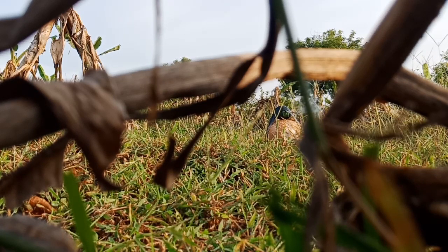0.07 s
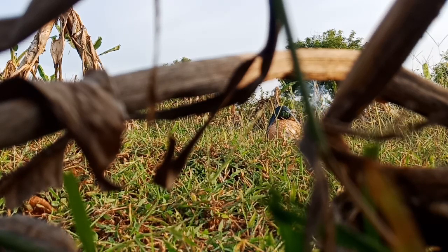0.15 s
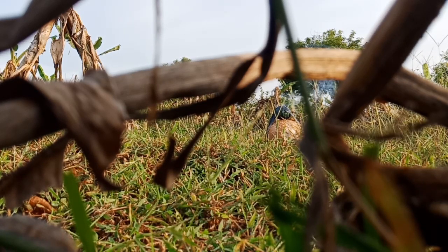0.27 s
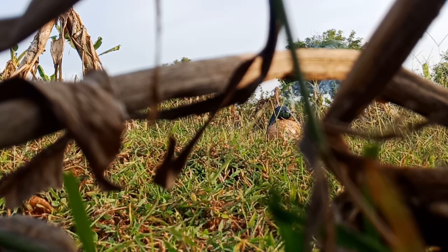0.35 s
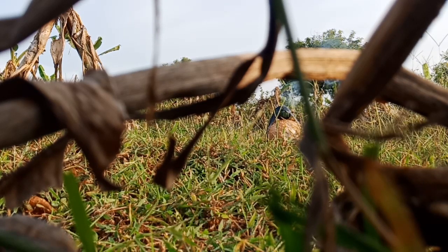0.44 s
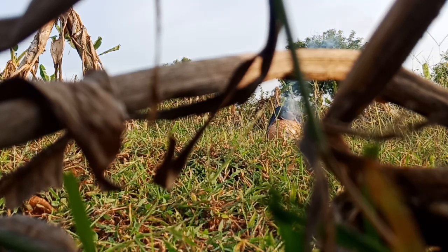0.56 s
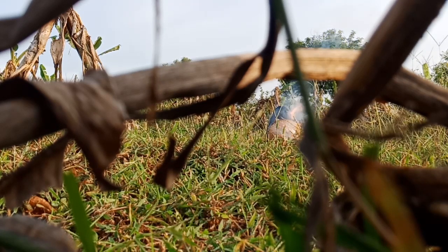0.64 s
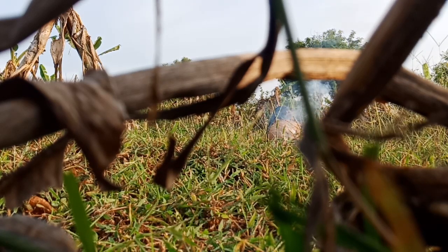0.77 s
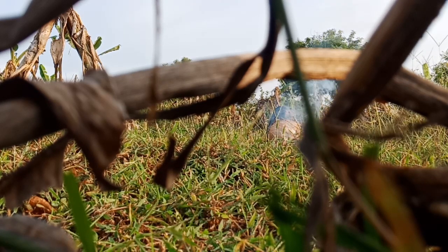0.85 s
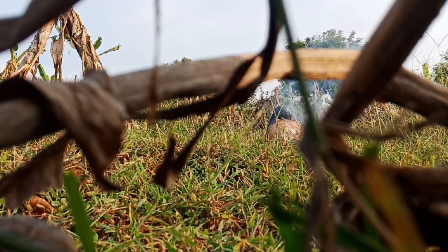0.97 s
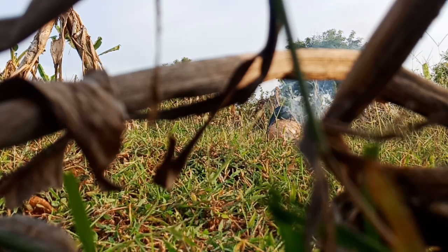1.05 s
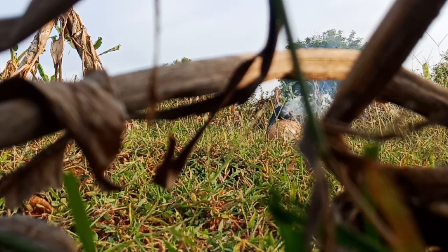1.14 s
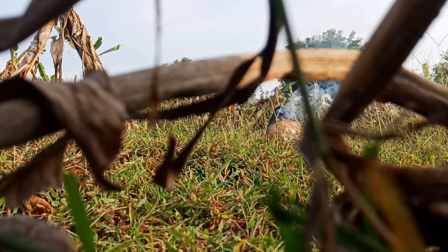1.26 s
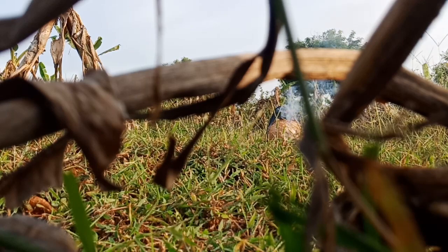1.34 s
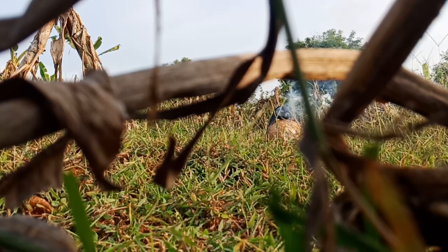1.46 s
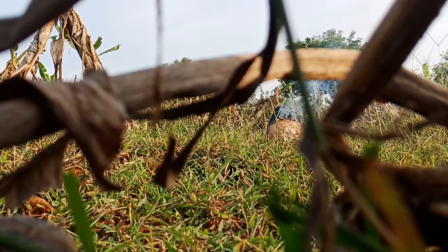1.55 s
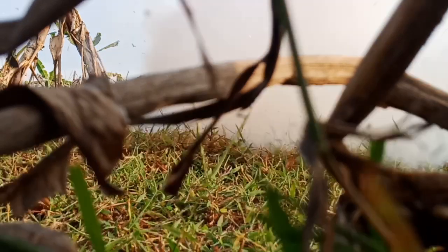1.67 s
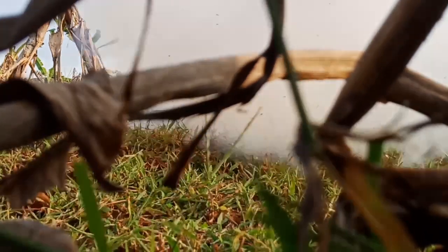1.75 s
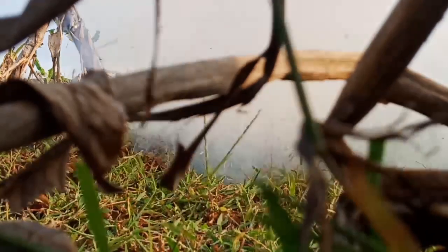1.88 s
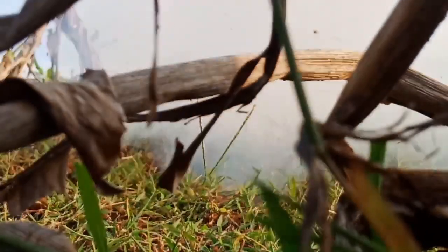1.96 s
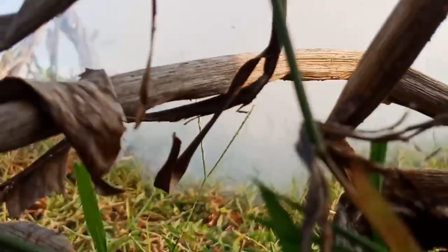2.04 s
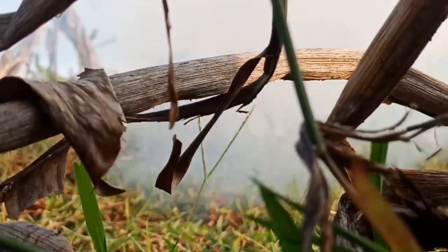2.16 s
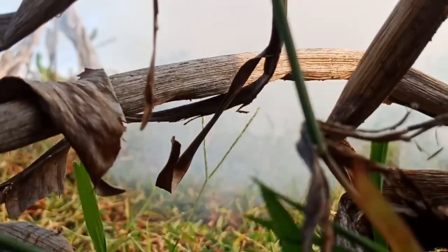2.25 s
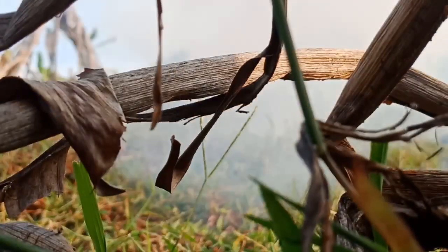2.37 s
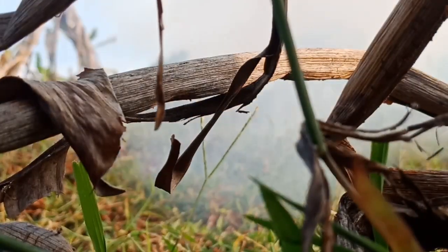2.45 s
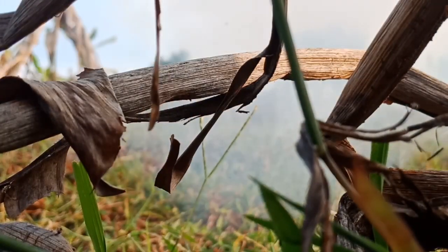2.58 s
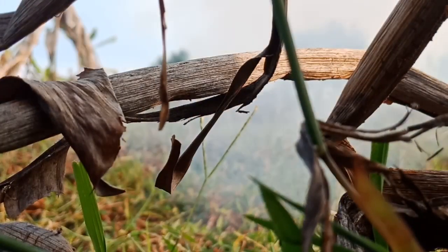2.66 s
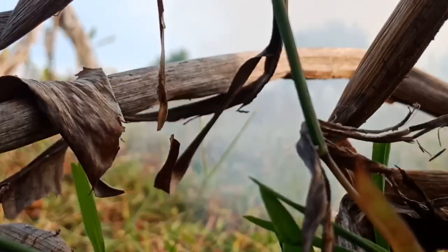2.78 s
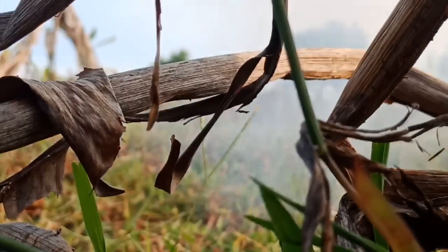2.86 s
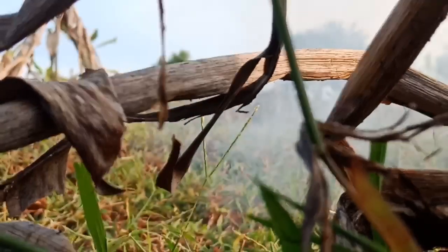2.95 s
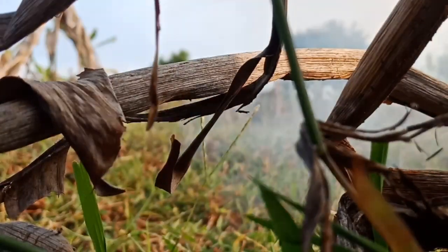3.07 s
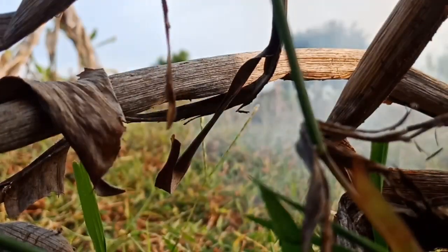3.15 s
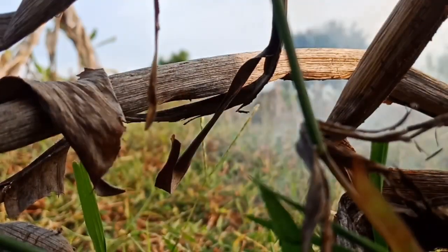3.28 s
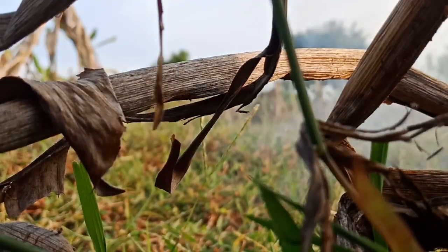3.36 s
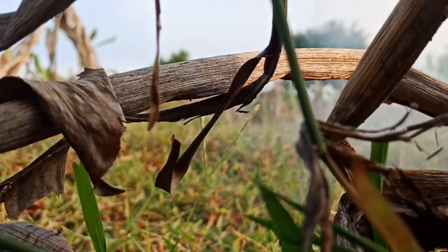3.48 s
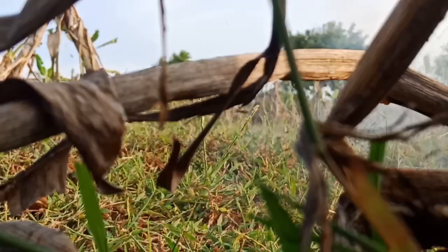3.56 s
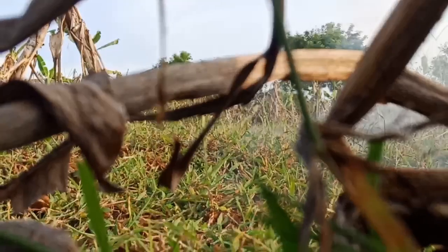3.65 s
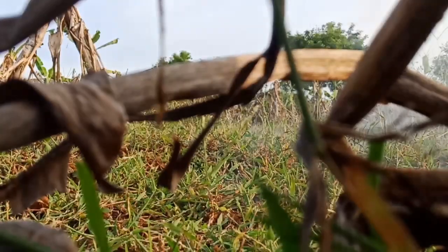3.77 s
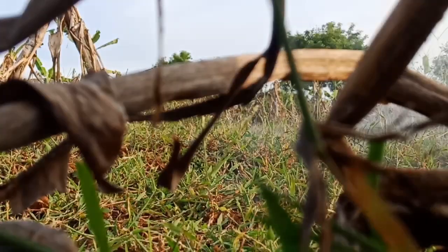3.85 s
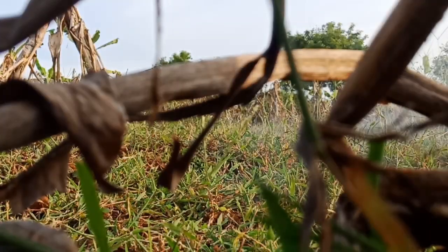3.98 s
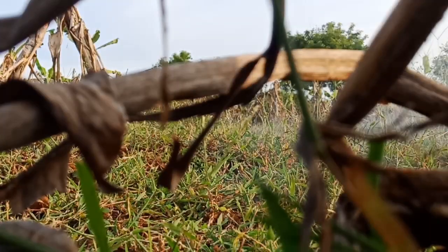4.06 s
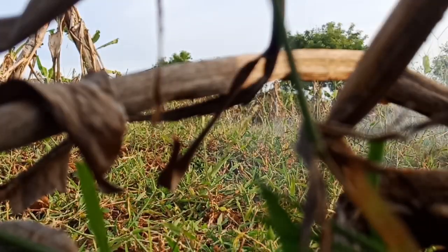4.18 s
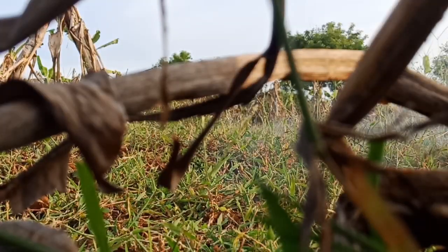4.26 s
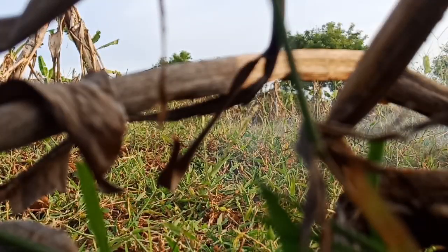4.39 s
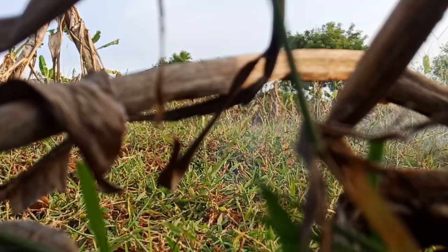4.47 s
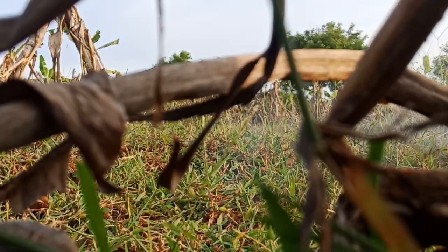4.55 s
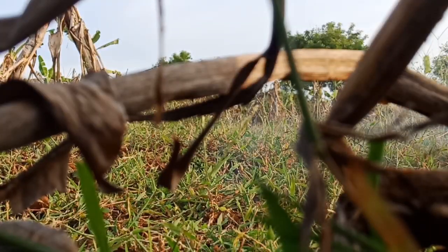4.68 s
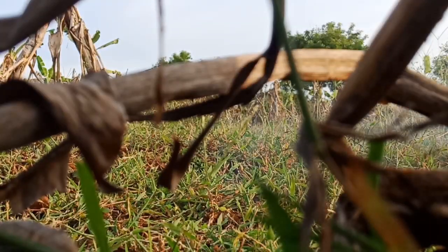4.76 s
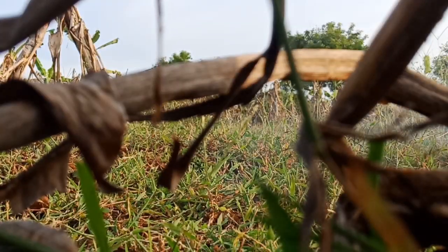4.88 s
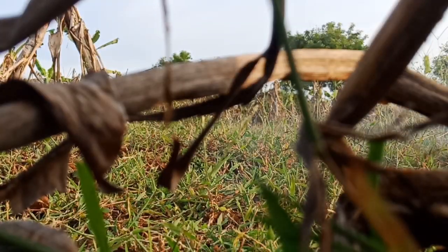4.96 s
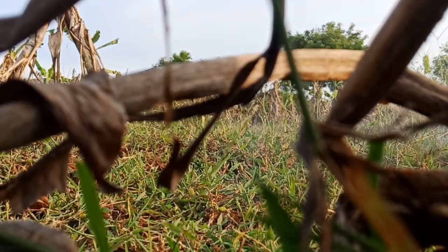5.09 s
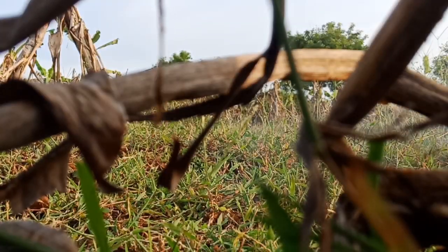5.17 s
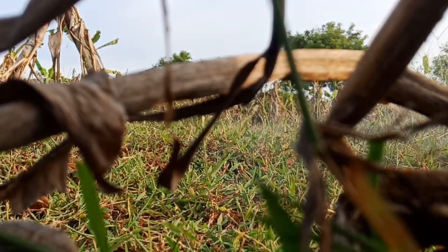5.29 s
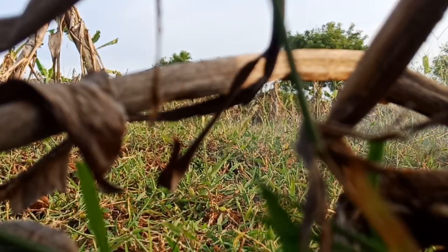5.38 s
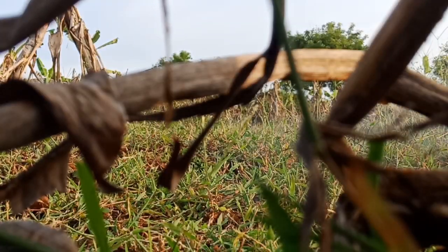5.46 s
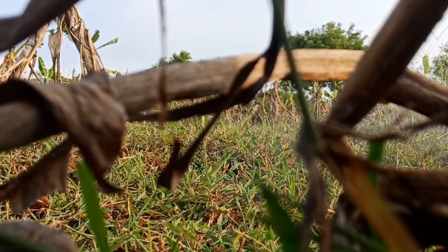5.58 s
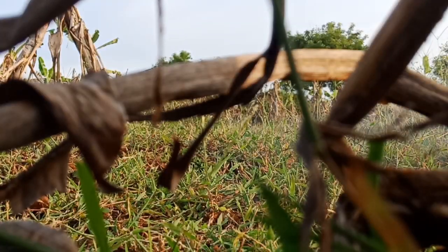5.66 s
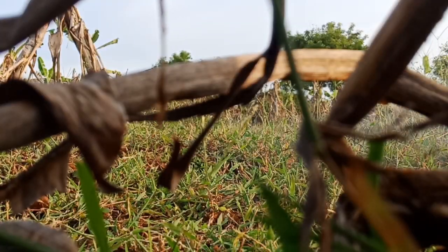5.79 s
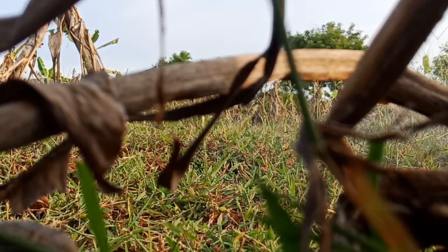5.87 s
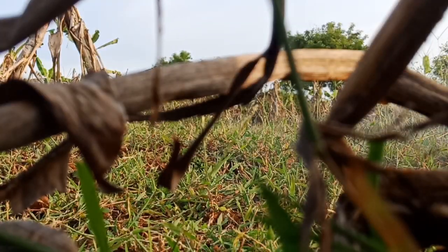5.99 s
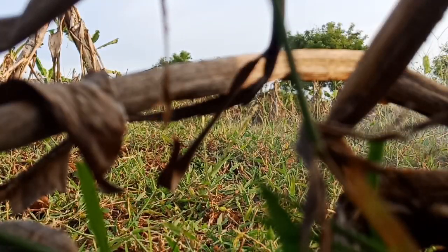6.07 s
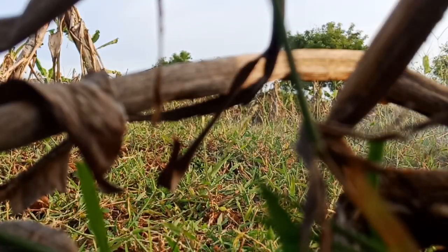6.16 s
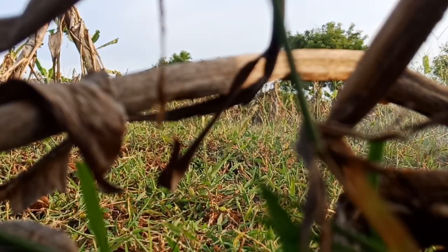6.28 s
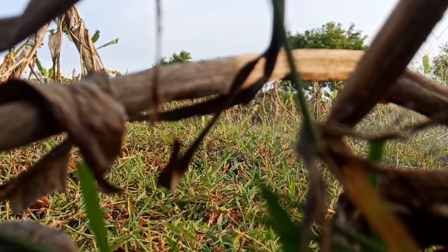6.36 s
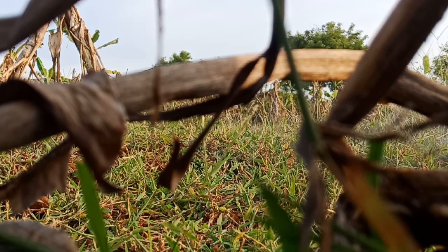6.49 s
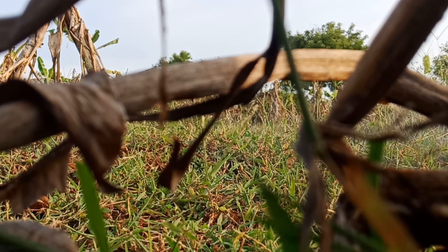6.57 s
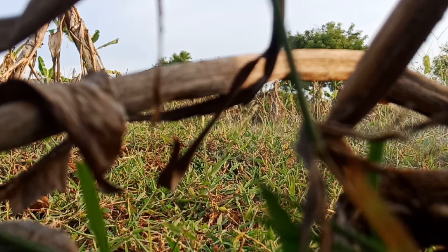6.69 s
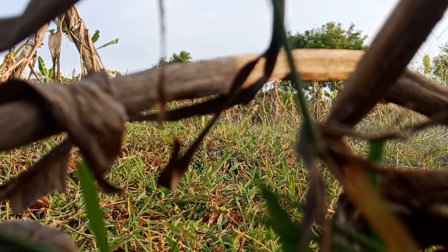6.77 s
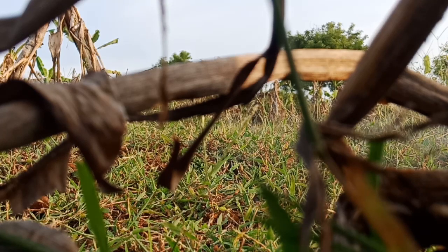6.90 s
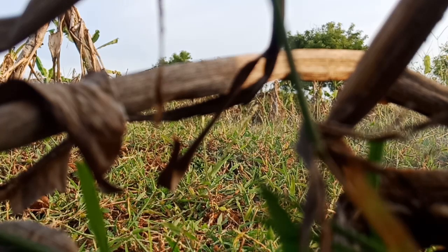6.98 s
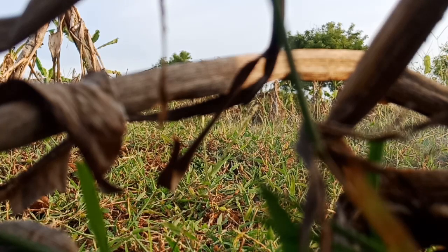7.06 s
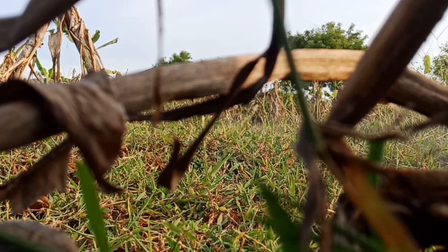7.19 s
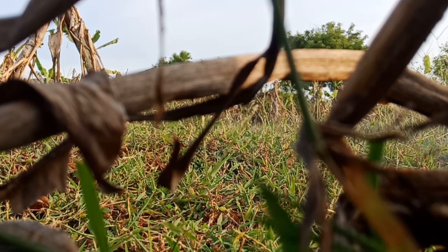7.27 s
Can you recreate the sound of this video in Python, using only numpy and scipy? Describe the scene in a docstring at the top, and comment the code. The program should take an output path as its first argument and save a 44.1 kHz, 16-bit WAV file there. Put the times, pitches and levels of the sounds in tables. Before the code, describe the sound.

After a soft hiss, one loud firecracker blast echoes over a field, debris ticks on dry leaves and a bird whistles repeatedly.

```python
"""A fuse spurts and hisses in a grassy field, a few metres from a stereo pair of microphones on the ground.
The firecracker goes off and overloads them; echoes roll back from the trees, grit patters on dry leaves.
Then a bird off to the right, perhaps a cuckoo, whistles eight wavering phrases that climb; the recorder
adds a faint glassy sheen. Behind it all: open air, a far engine's hum, one distant thud, a few hoots."""
import sys
import numpy as np
from scipy import signal
from scipy.fft import rfft, irfft, next_fast_len
from scipy.io import wavfile
from scipy.ndimage import uniform_filter1d, map_coordinates

SR = 44100
rng = np.random.default_rng(int(sys.argv[2]) if len(sys.argv) > 2 else 0)


def generate_wav(sig):
    """Save sig (samples, or channels by samples) to the path in sys.argv[1] as 16-bit PCM at SR."""
    pcm = np.round(np.clip(np.atleast_2d(sig).T, -1, 1) * 32767).astype(np.int16)
    wavfile.write(sys.argv[1], SR, pcm)


N = 323363

# the blast close up, its boom and its crack: f/Hz, relative level/dB
BOOM_SPECTRUM = [(20, -39), (60, -22.5), (130, -20), (165, -11), (210, 1), (290, -3.5), (400, 3.5),
                 (650, -1), (1000, -19), (1600, -28.5), (3000, -34.5), (8000, -52.5)]
CRACK_SPECTRUM = [(300, -13.5), (800, 11), (3000, -5.5), (5000, -19), (9000, -27.5), (15000, -30.5)]
BANG_S, PUSH_HZ, CRACK_HOLD_S = 1.744, 55.17, 0.007
BOOM_DB, BOOM_HOLD_S, BOOM_T60_S = 9, .018, 0.16

# one echo from each stand of trees: t/s, hold/s, rumble level/dB, roar level/dB
TREE_ECHOES = [(1.82, 0.11, -18, -29), (1.941, .11, -20, -25.5), (2.079, 0.06, -21.5, -35),
               (2.137, 0.11, -27.5, -33), (2.3, 0.019, -24.5, -35.5), (2.44, 0.038, -33, -57.5),
               (2.568, .018, -39.5, -76), (2.75, .11, -48.5, -48.5)]
# the echoes' rumble (when centred on RUMBLE_HZ) and their roar: f/Hz, relative level/dB
RUMBLE_SPECTRUM = [(25, -42), (60, -24.5), (110, -7), (165, 0), (205, 1.5), (260, -3), (350, -13),
                   (700, -56)]
ROAR_SPECTRUM = [(180, -16), (330, 3), (540, -1.5), (850, -11), (1400, -23.5), (2500, -26), (5000, -51),
                 (10000, -70.5)]
RUMBLE_HZ, NEAR_HZ, FAR_HZ, SINK_S = 200, 328.3, 113.2, .35  # the centre sinks from near to far
SMEAR_ATTACK, SMEAR_RUMBLE, SMEAR_ROAR = 0.058, 0.58, 0.72  # attack and t60s as shares of an echo's delay

# spurts of the fuse: t/s, hold/s, puff level/dB, hiss level/dB
FUSE_SPURTS = [(0.149, 0.013, -55, -71), (0.206, .11, -60, -72), (0.6, 0.11, -53.5, -53),
               (0.715, 0.03, -41.5, -47), (0.945, 0.13, -61, -71), (1.423, .03, -61.5, -66),
               (1.688, 0.0084, -51.5, -50.5)]
# their puff and hiss: f/Hz, relative level/dB
PUFF_SPECTRUM = [(60, -27.5), (130, -10), (300, -3), (480, -0.5), (750, -2.5), (1300, -17), (3000, -44.5)]
HISS_SPECTRUM = [(300, -21.5), (900, 6), (2500, 3.5), (3500, -6.5), (4100, -1.5), (5200, -20),
                 (8500, -20.5), (15000, -27)]

# waves of grit raining on the leaves: t/s, hold/s, level/dB
GRIT_SHOWERS = [(1.83, 0.083, -42), (1.956, 0.092, -37), (2.174, .08, -46.5), (2.288, 0.022, -55)]
# the leaves' answer to a speck, and the snap of contact: f/Hz, relative level/dB
LEAF_SPECTRUM = [(600, -40.5), (1200, -10.5), (2000, -6), (2500, -6.5), (3200, 1.5), (4200, -8),
                 (5300, -24), (6400, -27), (7500, -16), (9300, -31), (12000, -28), (15800, -36)]
SNAP_SPECTRUM = [(700, -21), (1500, -15.5), (2400, -4), (4000, 3), (6000, -11), (7600, -11.5),
                 (15000, -16.5)]
# the largest bits landing: t/s, relative peak/dB, leaf f/Hz, pan before narrowing/dB, snap over ring/dB
LARGE_BITS = [(1.955, -28.5, 3260, 0, -2), (2.1375, -25, 3880, -7, 0), (2.1487, -24.5, 3130, 5, 4),
              (2.1715, -37, 3640, -8, 0), (2.1956, -27, 3000, -10.5, 1.5), (2.2393, -32, 3550, 13, -8),
              (2.2537, -30, 2530, 4, -1), (2.3519, -36.5, 2800, -16, 14), (2.4633, -33, 4200, -10, -2.5),
              (2.594, -45.5, 3850, -14, -5), (2.7766, -47.5, 3080, -7.5, -1),
              (2.8939, -48.5, 3950, -17, 13), (3.309, -49.5, 3960, 5.5, 9), (3.4771, -35, 3710, 20.5, -6),
              (3.9243, -48.5, 3250, 6.5, 2), (4.0057, -41, 4020, -10, 14), (6.5545, -52.5, 3050, -1.5, 5),
              (6.605, -53.5, 3700, -19, -5)]
# modes of a struck dry leaf: multiple of its pitch, relative level/dB, t60/s
LEAF_RING = [(.62, -11, .013), (.82, -9, .012), (1, 0, .023), (1.14, -5, .016), (1.95, -7, .012),
             (3.1, -17, .008)]
SMALL_FROM_S, SMALL_SPREAD_S, SMALL_DB, SMALL_FADE_DB_PER_S = 2.2, 0.55, -46, 4.5
SMALL_HZ, SMALL_PAN_DB, SMALL_SNAP_DB = 3370, 11, 4.5

# the bird's phrases: crest t/s, crest f/Hz, stretch of the tune in time
BIRD_PHRASES = [(3.52, 1252, .6), (3.743, 1370, 0.93), (3.998, 1440, 1), (4.260, 1488, 1.04),
                (4.528, 1528, 1.05), (4.807, 1575, 1.09), (5.097, 1590, 1.08), (5.378, 1599, 1.015)]
# their tune; lower phrases dip deeper: t/s from the crest, f/Hz at the top, Hz lost per Hz of lower crest
BIRD_TUNE = [(-.125, 1330, 1.25), (-.104, 1448, 1.35), (-.058, 1305, 1.55), (-.035, 1370, 1.5),
             (-.006, 1600, 1), (.005, 1600, 1), (.033, 1330, .95), (.078, 1085, .9)]
# the higher the note, the harder it is blown: f/Hz, relative level/dB, pan/dB
BIRD_EFFORT = [(810, -90, 0), (982, -60.5, 5), (1180, -60, 11.5), (1341, -51.5, -10.5), (1403, -49, -5.5),
               (1440, -42.5, -2.5), (1492, -39.5, -1.5), (1630, -34, 1)]
WHISTLE_DB, WHISTLE_ATTACK_S, WHISTLE_RELEASE_S, LOWEST_HZ = 1, 0.022, 0.023, 900
# mirror tones the recorder adds to the whistle: centre f/Hz, lower image/dB, upper image/dB
RECORDER_SHEEN = [(3890, -30, -29.5), (7780, -35, -33), (11665, -37, -37), (15555, -39, -90)]

# faint hoots far off: centre t/s, half length/s, f/Hz, level/dB
FAR_HOOTS = [(5.983, 0.035, 504, -64), (6.091, 0.043, 775, -68.5), (6.261, 0.051, 786, -66.5),
             (6.553, .12, 344.5, -65.5), (6.928, 0.094, 355, -67.5)]
# the distant thud, the engine's partials and the open air: f/Hz, relative level/dB
THUD_SPECTRUM = [(100, -6), (300, -2.5), (550, 6), (850, -2), (1200, -21), (3000, -38), (8000, -81)]
ENGINE_PARTIALS = [(59.5, -69), (91.5, -75.5), (120.7, -77), (180, -83.5)]
AIR_SPECTRUM = [(25, -18.5), (45, -11), (90, -10.5), (200, -10.5), (500, -11.5), (620, -14), (760, -12),
                (1320, -16.5), (2800, -20.5), (3700, -23.5), (5100, -34), (8300, -32), (11000, -35.5),
                (15800, -37)]
# colour of the microphones: f/Hz, gain/dB
MIC_RESPONSE = [(3500, 0.4), (7000, -1.3), (15000, -3.5)]
MIC_CEILING, TOP_HZ = .93, 15830


def blast():
    """Close up: a shock front, its crack and push of air, and the boom scattered by ground and plants."""
    age = clock() - BANG_S
    after = age > 0
    shock_age = np.maximum(age, 0) / 0.00093  # pressure turns to suction at 1
    shock = amp(16.5) * after * (1 - shock_age) * np.exp(-shock_age)
    push = amp(-10) * after * bump(1.768, .024) * np.sin(2 * np.pi * PUSH_HZ * age)
    boom_level = after * amp(BOOM_DB) * swell(BANG_S, BOOM_HOLD_S, 1 / SR, BOOM_T60_S)
    boom = boom_level * field(BOOM_SPECTRUM, spread_m=0.18)
    crack_level = amp(-0.5) * swell(BANG_S, CRACK_HOLD_S, 1 / SR, t60=.045)
    crack_level += amp(-2.5) * dying(BANG_S, t60=0.16)
    return shock + push + boom + crack_level * field(CRACK_SPECTRUM, spread_m=0.19)


def echoes():
    """The bang returns from the trees over the open country's roll; longer paths smear and deepen it."""
    echo = lambda s, hold, smear: swell(s, hold, SMEAR_ATTACK * (s - BANG_S), smear * (s - BANG_S))
    rumble_level = together([amp(db) * echo(s, hold, SMEAR_RUMBLE) for s, hold, db, _ in TREE_ECHOES]
                            + [amp(-37.5) * dying(BANG_S, t60=4.8)])
    roar_level = together([amp(db) * echo(s, hold, SMEAR_ROAR) for s, hold, _, db in TREE_ECHOES]
                          + [amp(-48) * dying(BANG_S, t60=4.7)])
    t = clock()
    centre_hz = FAR_HZ + (NEAR_HZ - FAR_HZ) * np.exp(-np.maximum(t - BANG_S, 0) / SINK_S)
    slowing_time = np.cumsum((t > BANG_S) * centre_hz / RUMBLE_HZ) / SR
    rumble = np.array([np.interp(slowing_time, t, side) for side in field(RUMBLE_SPECTRUM, spread_m=0.14)])
    roar = amp(2.8 * wobble(45)) * field(ROAR_SPECTRUM, spread_m=0.2)
    return rumble_level * rumble + roar_level * roar


def fuse():
    """A few metres off, each spurt of gas is a dull puff with a hiss on top."""
    spurt = lambda s, hold: swell(s, hold, attack=0.028, t60=0.29)
    puff = together([amp(db) * spurt(s, hold) for s, hold, db, _ in FUSE_SPURTS])
    hiss = together([amp(db) * spurt(s, hold) for s, hold, _, db in FUSE_SPURTS])
    flicker = amp(1.3 * wobble(60))
    return flicker * (puff * field(PUFF_SPECTRUM, spread_m=0.081) + hiss * field(HISS_SPECTRUM, spread_m=.05))


def grit():
    """Specks of uneven size strike the leaves in clumps, left and right; fine dust keeps falling."""
    specks_per_s = 2400 * np.exp(.35 * wobble(90))
    size = amp(5 * rng.standard_normal(N)) * rng.choice([-1, 1], N)
    strikes = rng.random(N) < specks_per_s / SR
    specks = strikes * size * (.7 + rng.standard_normal((2, N)))
    showers = [amp(db) * swell(s, hold, attack=.006, t60=0.35) for s, hold, db in GRIT_SHOWERS]
    dust = amp(-55.5) * dying(BANG_S, t60=4.5)
    return together(showers + [dust]) * unit(filtered(specks, lambda hz: amp(along(LEAF_SPECTRUM, hz))))


def falling_bits():
    """Larger bits tick on dry leaves: a snap of contact and a short ring; soft landings are duller."""
    out, t = np.zeros((2, N + SR)), np.arange(2048) / SR
    ratio, mode_db, t60 = np.transpose(LEAF_RING)[:, :, None]
    snap = field(SNAP_SPECTRUM, spread_m=0.06)
    treble = np.interp(np.fft.rfftfreq(len(t), 1 / SR), [4000, 7000], [0, 1])
    for s, db, hz, pan_db, snap_db in LARGE_BITS + small_bits(count=9):
        start = round(s * SR)
        span = slice(start, start + len(t))
        mode_hz = hz * ratio * np.exp(0.071 * rng.standard_normal(ratio.shape))
        phase = 2 * np.pi * rng.random(ratio.shape) + 0.48 * rng.standard_normal((2, len(ratio), 1))
        ring = (amp(mode_db - 60 * t / t60) * np.sin(2 * np.pi * mode_hz * t + phase)).sum(axis=1)
        tick = ring + amp(snap_db - 60 * t / .016) * snap[:, span]
        dulling_db = min(0, .7 * (db + 35))
        tick = irfft(rfft(tick) * amp(treble * dulling_db))
        out[:, span] += amp(db + 1.5) * panned(0.6 * pan_db) * tick / np.abs(tick).max()
    return out[:, :N]


def small_bits(count):
    """Smaller bits land at random, ever rarer and lighter; columns as in LARGE_BITS."""
    chance = rng.random((count, 4))
    delay = -SMALL_SPREAD_S * np.log(1 - (np.arange(count) + chance[:, 0]) / count)
    size, pitch, side = 2 * chance[:, 1:].T - 1
    times = np.minimum(SMALL_FROM_S + delay, N / SR - .1)
    db = SMALL_DB - SMALL_FADE_DB_PER_S * delay + 3 * size
    return list(zip(times, db, SMALL_HZ * (1 + .15 * pitch), SMALL_PAN_DB * side, [SMALL_SNAP_DB] * count))


def bird():
    """A nearly pure whistle: each phrase opens, dips, swings up to a loud crest and slides away."""
    t = clock()
    knots, gate = [], np.zeros(N)
    top_hz = max(hz for _, hz, _ in BIRD_TUNE)
    for s, crest_hz, stretch in BIRD_PHRASES:
        phrase = [(s + stretch * offset, max(LOWEST_HZ, hz - sag * (top_hz - crest_hz)))
                  for offset, hz, sag in BIRD_TUNE]
        opening = np.clip((t - phrase[0][0]) / WHISTLE_ATTACK_S, 0, 1)
        closing = np.clip((phrase[-1][0] - t) / WHISTLE_RELEASE_S, 0, 1)
        gate += opening * closing
        knots += phrase
    pitch = uniform_filter1d(np.interp(t, *np.transpose(knots)), size=600)
    hz, effort_db, pan_db = np.transpose(BIRD_EFFORT)
    level = gate * amp(WHISTLE_DB + np.interp(pitch, hz, effort_db) + .9 * wobble(70))
    delay_s = np.array([[.00013], [0]])  # the bird sits to the right, so the left microphone hears it late
    phase = 2 * np.pi * (np.cumsum(pitch) / SR - delay_s * pitch)
    whistle = np.sin(phase) + amp(-36) * np.sin(2 * phase)
    direct = np.sqrt(2) * level * panned(np.interp(pitch, hz, pan_db)) * (whistle + recorder_sheen(phase))
    # near plants scatter the whistle at once, the trees a little later
    scatter = rng.standard_normal((2, N)) * (dying(0.0035, t60=0.053) + 0.27 * dying(0.008, t60=0.51))
    return direct + amp(-12.5) * signal.fftconvolve(direct, unit(scatter) / np.sqrt(N), axes=1)[:, :N]


def recorder_sheen(phase):
    """Faint glassy tones that the recorder adds, mirroring the whistle around fixed pitches."""
    sheen = np.zeros_like(phase)
    for centre_hz, lower_db, upper_db in RECORDER_SHEEN:
        mirror = 2 * np.pi * centre_hz * clock()
        sheen += amp(lower_db) * np.sin(mirror - phase) + amp(upper_db) * np.sin(mirror + phase)
    return sheen


def hoots():
    """Faint, wavering tones from far off."""
    wavering_time = clock() + np.cumsum(0.0275 * wobble(33)) / SR
    return sum(amp(db) * bump(s, half) * np.sin(2 * np.pi * hz * wavering_time)
               for s, half, hz, db in FAR_HOOTS)


def thud(at_s):
    """One dull knock in the distance, with a short tail."""
    level = amp(-61) * dying(at_s, t60=0.18) + amp(-53) * dying(at_s, t60=0.82)
    return level * field(THUD_SPECTRUM, spread_m=0.1)


def engine():
    """A far engine hums, wavering in pitch and level and slowly growing louder."""
    drifting_time = clock() + np.cumsum(0.0035 * wobble(0.62)) / SR
    hum = sum(np.sqrt(2) * amp(db + 2.001 * wobble(3)) * np.sin(2 * np.pi * hz * drifting_time)
              for hz, db in ENGINE_PARTIALS)
    return hum * amp(np.interp(clock(), [0, N / SR], [-3, 1]))


def open_air():
    """The field's own soft rush, all round the microphones and rising slightly."""
    level_db = np.interp(clock(), [0, N / SR], [-62, -60.5]) + 0.56 * wobble(2.3)
    return amp(level_db) * field(AIR_SPECTRUM, spread_m=.17)


def amp(db):
    """Decibels to gain."""
    return 10 ** (np.asarray(db) / 20)


def unit(x):
    """Scaled to rms 1."""
    return x / np.sqrt(np.mean(x ** 2) + 1e-20)


def clock():
    """The time of every sample."""
    return np.arange(N) / SR


def along(points, hz):
    """Interpolates (f/Hz, value) points on a log axis."""
    f, v = np.transpose(points)
    return np.interp(np.log(hz + 1), np.log(f + 1), v)


def wobble(rate):
    """A smooth random curve, rate knots a second."""
    return map_coordinates(rng.standard_normal(int(N * rate / SR) + 4), [clock() * rate])


def filtered(x, response):
    """x shaped by a gain that depends on frequency."""
    m = next_fast_len(N + SR // 2)
    return irfft(rfft(x, m) * response(np.fft.rfftfreq(m, 1 / SR)), m)[..., :N]


def field(spectrum, spread_m):
    """Stereo noise of rms 1 from a fan of directions; spread_m is the largest path difference."""
    grid = np.linspace(0, SR / 2, num=400)
    paths = spread_m * np.cos(np.linspace(0, np.pi, num=48))
    coherence = np.cos(2 * np.pi * np.outer(grid, paths) / 343).mean(axis=1)
    mid_share = lambda hz: np.clip((1 + np.interp(hz, grid, coherence)) / 2, 0, .985)
    response = lambda hz: amp(along(spectrum, hz)) * np.sqrt([mid_share(hz), 1 - mid_share(hz)])
    mid, side = filtered(rng.standard_normal((2, N)), response)
    return unit(np.array([mid + side, mid - side]))


def panned(pan_db):
    """Left and right gains; positive is left."""
    return amp(np.array([[.5], [-.5]]) * pan_db)


def dying(start, t60):
    """An envelope that jumps up at start and falls 60 dB in t60."""
    age = clock() - start
    return (age > 0) * np.exp(-np.log(1000) * np.abs(age) / t60)


def bump(centre, half):
    """A flat-topped swell with soft edges."""
    return np.exp(-np.square(np.square((clock() - centre) / half)))


def swell(start, hold, attack, t60):
    """An envelope that rises to full at start, holds and falls 60 dB in t60."""
    age = clock() - start
    return np.clip(1 + age / attack, 0, 1) * np.exp(-np.log(1000) * np.maximum(age - hold, 0) / t60)


def together(levels):
    """The level of unrelated sounds heard at once."""
    return np.sqrt(sum(np.square(level) for level in levels))


def scene():
    """The field as the two microphones in the grass hear it."""
    firecracker = fuse() + blast() + echoes() + grit() + falling_bits()
    return firecracker + bird() + open_air() + engine() + hoots() + thud(at_s=5.142)


def record(dry):
    """The microphones flatten the blast's peaks, soften the treble and pass nothing above TOP_HZ."""
    overloaded = dry / (1 + np.abs(dry / MIC_CEILING) ** 6) ** (1 / 6)
    return filtered(overloaded, lambda hz: amp(along(MIC_RESPONSE, hz)) * (hz < TOP_HZ))


dry = scene()
out = record(dry)
generate_wav(out)
```